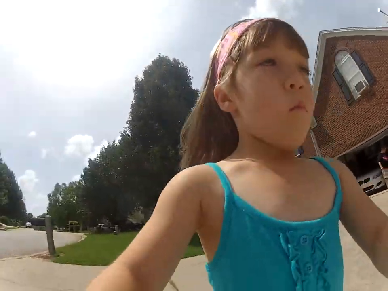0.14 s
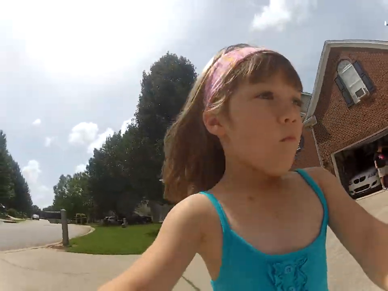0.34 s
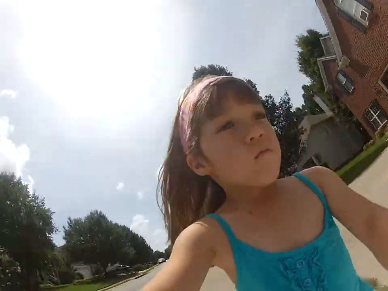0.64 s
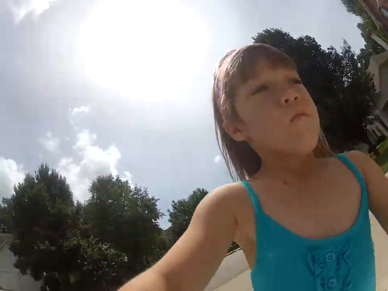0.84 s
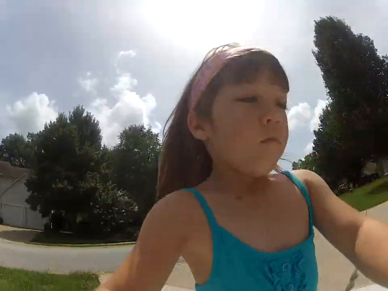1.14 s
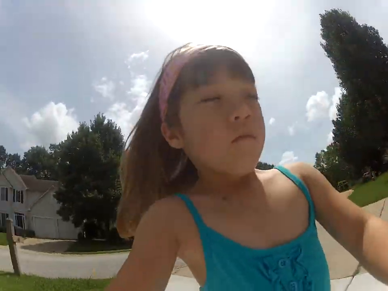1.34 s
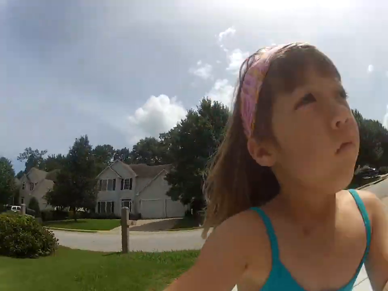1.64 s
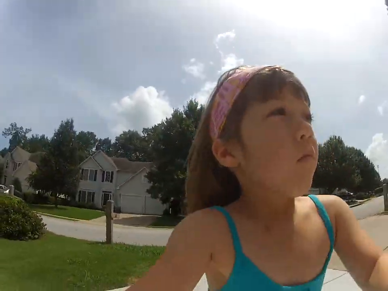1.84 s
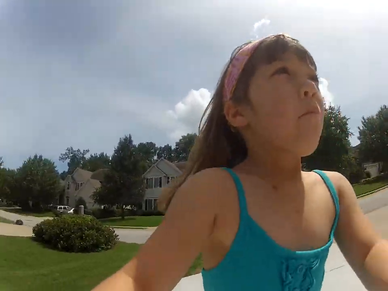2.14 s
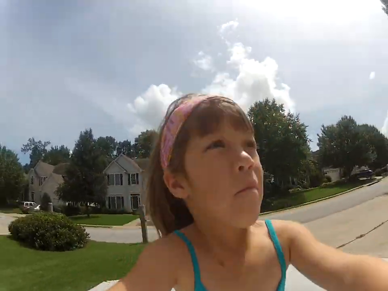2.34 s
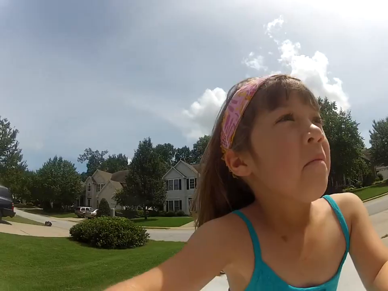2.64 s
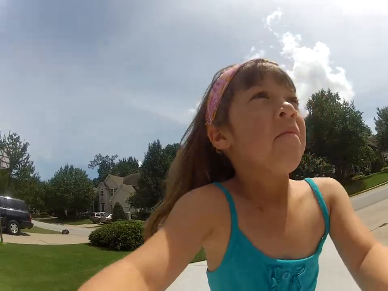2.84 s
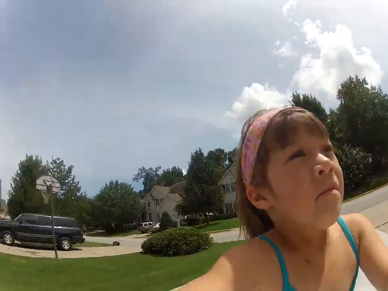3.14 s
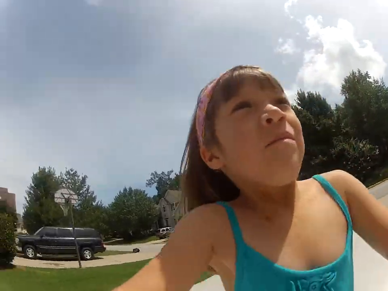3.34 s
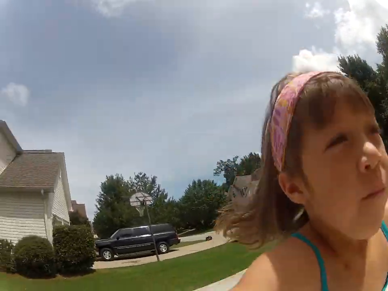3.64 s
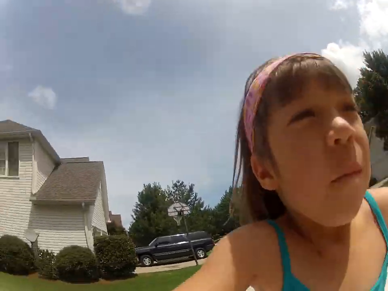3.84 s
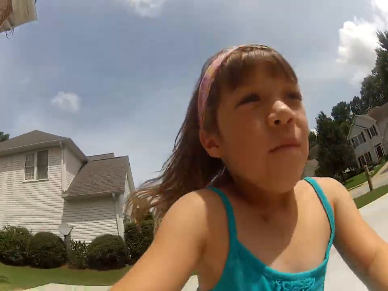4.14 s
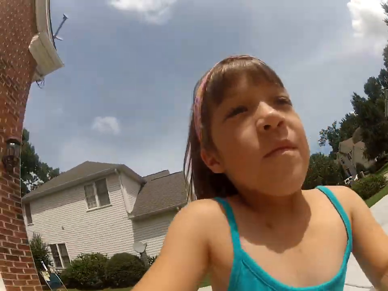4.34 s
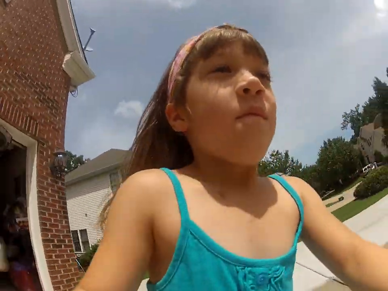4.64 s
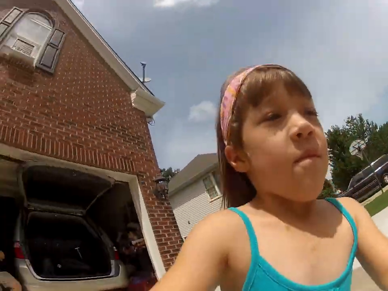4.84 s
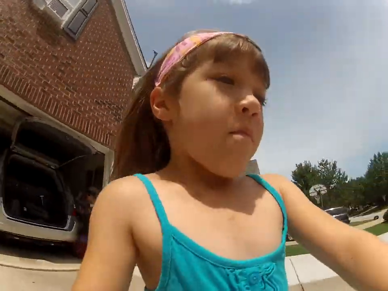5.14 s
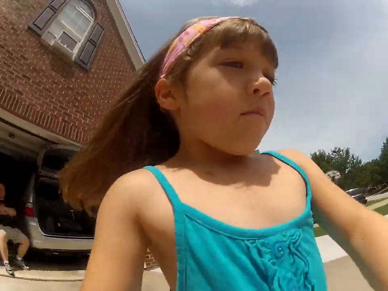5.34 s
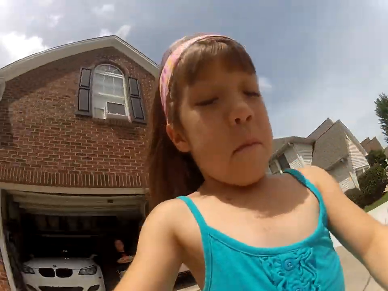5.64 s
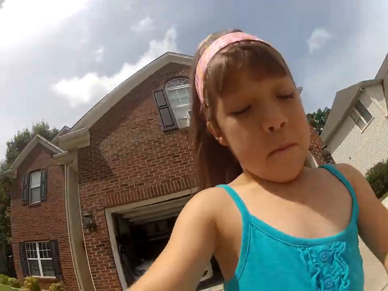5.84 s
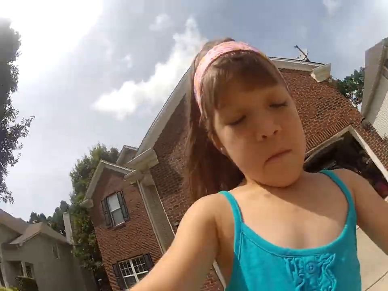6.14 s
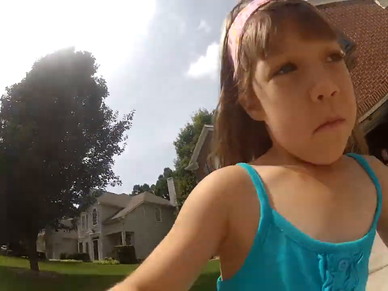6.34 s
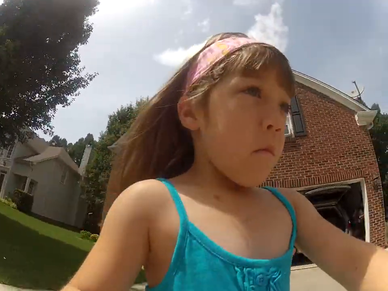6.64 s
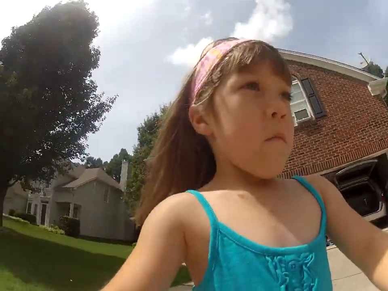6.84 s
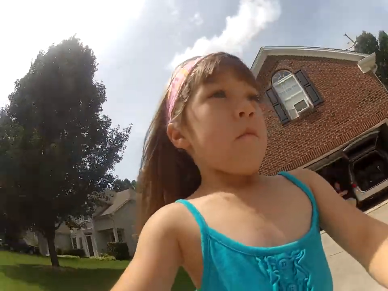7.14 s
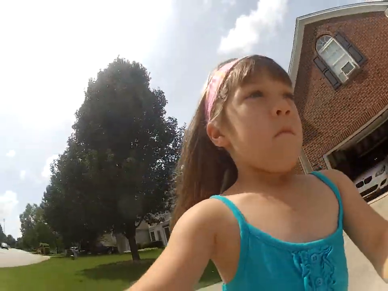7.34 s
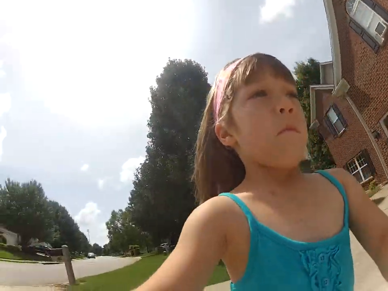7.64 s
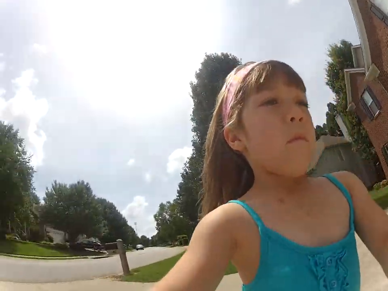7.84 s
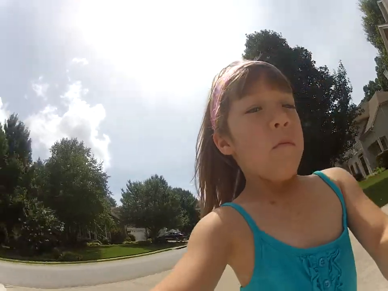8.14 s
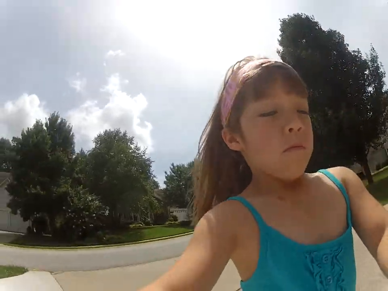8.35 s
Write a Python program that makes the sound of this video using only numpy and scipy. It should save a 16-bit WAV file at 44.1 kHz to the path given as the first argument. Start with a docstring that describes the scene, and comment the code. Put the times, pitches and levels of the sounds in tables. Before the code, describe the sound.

Continuous rolling of small hard wheels on rough concrete: deep, shuddering rumble, mid-pitched drone and dry gritty rattle. Irregular knocks punctuate it, the strongest around four seconds, and the wheels briefly run light after hard blows. Fine bearing whirs, mudguard scuffs and metallic lever clinks come and go, with more clinks near the end. The microphone is fixed to the handlebar, without echo; the right side is nearly silent hiss.

```python
"""First heard is a rough rumble with a droning note: a kick scooter circling on a concrete driveway.
Random bumps excite resonances of frame and hard wheels; joints and stones add damped thuds and clacks.
Loose fittings chatter, most at strong swings of the frame; sand, brake lever, mudguard and bearing add
fine noises. The microphone is fixed to the handlebar; nearly all of the sound is in the left channel."""
import sys
import numpy as np
from scipy import signal
from scipy.fft import rfft, irfft
from scipy.io import wavfile
from scipy.ndimage import uniform_filter1d

SR = 44100
rng = np.random.default_rng(int(sys.argv[2]) if len(sys.argv) > 2 else 0)


def master(y):
    """Save y as 16-bit WAV."""
    cut = np.clip(np.atleast_2d(y).T, -1, 1)
    pcm = np.round(cut * 32767)  # scale
    wavfile.write(sys.argv[1], SR, pcm.astype(np.int16))


N = 375291
TIME = np.arange(N) / SR

# Levels are nominal, ahead of the trims of each source and the input gain. Spectra are relative, per Hz.
# microphone inputs: spectrum of the hiss [f/Hz, level/dB]
HISS = [(20, 0), (200, 3), (1000, -4), (4000, -8), (15000, -9)]
EDGE_HZ = 15500  # upper band limit

# spells in which a wheel bearing whirs [start t/s, end t/s, f/Hz, level/dB, wander as a share of f]
WHIRS = [(1.45, 1.8, 2090, -71, 0.016), (1.872, 2.357, 2120, -55.5, .012), (2.54, 3.2, 2110, -55, 0.02),
         (3.25, 3.4, 2150, -67, .02), (4.9, 5.3, 3100, -67, .06), (6.7, 7.15, 3380, -58.5, .05),
         (7.753, 7.97, 2870, -58.5, .012)]
WHIR_FADE_DB_PER_S = 91

# the loudest clinks of the brake lever against its stop [t/s, level/dB]
CLINKS = [(0.153, -62), (1.241, -59), (4.545, -61), (4.725, -62), (6.131, -57.5), (6.925, -58),
          (6.981, -57), (7.353, -50.5), (7.408, -55), (7.45, -60), (7.878, -52.5), (7.953, -52),
          (8.083, -53), (8.146, -54.5)]
# modes of the brake lever [f/Hz, level/dB, t60/s]
LEVER = [(1354, 4, 0.059), (2850, 1.5, 0.046), (4280, -3, 0.044), (4900, -0.5, 0.029), (6900, -1, 0.058),
         (7700, -11, 0.05), (8108, -12, 0.05), (9300, -14, .04), (10950, -18, .05), (14240, -17, 0.07)]
# fainter clinks come at random, their level relative to that of the chatter
CLINKS_PER_S, CLINK_OVER_DB, CLINK_SPREAD_DB = 2.4, -12, 0.5

# scuffs of the rear mudguard on its wheel [t/s, level/dB, t60/s, ringing f/Hz, share of ring 0-1]
SCUFFS = [(4.477, -46.5, 0.36, 3300, 0.1), (4.703, -38.5, 0.23, 3900, 0.1), (6.471, -43, 0.19, 3640, 0.2),
          (6.489, -39.5, 0.067, 3780, 0.7), (7.35, -40, 0.066, 4360, 0.15),
          (7.933, -32.5, 0.073, 2900, 0.23), (7.943, -38, 0.14, 8160, 0.4)]

# the loudest grains of sand snapping under a wheel [t/s, peak level/dB, t60 of the crumbs/s]
GRIT = [(0.215, -43, 0.024), (0.257, -44, .022), (1.462, -46, .02), (1.936, -41.5, 0.022),
        (2.1395, -39, .004), (2.164, -37, 0.0056), (2.285, -39.5, 0.014), (2.416, -39, .02),
        (2.514, -40, .012), (2.856, -37, .004), (3.008, -46, .02), (3.035, -46, .03), (3.452, -46, .01),
        (3.867, -46, .012), (4.48, -39, 0.02), (4.506, -38, .02), (4.541, -39, .022), (4.591, -43, .015),
        (6.066, -43, .015), (6.115, -41, 0.0088), (6.283, -40, .022), (6.68, -37, .004), (6.831, -42, .008),
        (6.878, -40, 0.025), (6.909, -36.5, .018), (7.125, -39, 0.041), (7.324, -39, 0.024),
        (7.758, -36.5, 0.033), (7.859, -39, .022), (7.977, -35, 0.026), (8.127, -38.5, 0.024)]
# fainter grains come at random, their level relative to that of the chatter
GRIT_PER_S, GRIT_OVER_DB, GRIT_SPREAD_DB = 3, 9.5, 2

# scatter of the resonances of each contact, and of its brightness
TINT_DB, TINT_DB_PER_OCTAVE = 4, 1.5
# taps between fittings: typical length, its scatter either way, range of strengths, rate
TAP_S, TAP_OCTAVES, TAP_RANGE_DB, TAPS_PER_S = .0017, 1.9, 20.5, 80
# loose clamps and bolts, each rattling at its own pitch [f/Hz, width/Hz, level/dB]
BOLTS = [(2860, 260, -8.5), (3760, 800, -7), (5020, 1700, -5), (6840, 89, -7.5), (8080, 110, -12.5),
         (9500, 1000, -10), (10900, 1000, -11), (14200, 200, -6)]
# spectrum of the chatter [f/Hz, level/dB]
CHATTER = [(600, 7.5), (1600, -4), (2300, -2), (3000, -0.5), (3900, -3), (5000, 0.1), (6200, -7),
           (8300, -8.5), (11000, -13), (14000, -20.5), (15500, -47.5)]
# spectrum of the rasp of sand under the wheels [f/Hz, level/dB]
SAND = [(600, -28), (1500, 1.5), (2100, 1), (3000, 1.5), (3900, 0), (5100, -1), (6000, -6.5), (8000, -16.5),
        (13000, -46.5), (15500, -41)]
# share of bright rattling in the chatter, the rest being dull rasp [t/s, share 0-1]
LOOSE = [(0, 0.75), (2.8, 0.3), (4.6, 0.79), (6.3, 0.67), (7.0, 0.88), (8.5, 0.53)]
RASP_DB = -1.5  # rasp against the chatter
SCRAPE_DB = -77  # faint scrape that stays when the wheels run light

# dips in the concrete that flex the deck [t/s, peak level/dB, f/Hz]
BOOMS = [(0.149, -18, 295), (0.592, -23.5, 295), (0.948, -18, 316), (1.602, -15, 285), (2.415, -15.5, 259),
         (2.427, -14.5, 289), (2.488, -19.5, 270), (3.047, -16, 335), (3.075, -21, 348),
         (3.509, -16.5, 320), (3.719, -21, 306), (4.325, -19, 306), (4.895, -24, 320), (5.417, -20, 316),
         (6.343, -16.5, 257), (6.523, -15, 323)]
BOOM_RISE_S, BOOM_FALL_S = 0.0051, 0.0059

# pits and pebbles that make a wheel ring without jolting the frame [t/s, level/dB, f/Hz]
CLACKS = [(0.189, -25.5, 746), (0.257, -28, 720), (0.381, -19, 608), (0.838, -27.5, 594),
          (0.87, -25.5, 780), (0.933, -21, 710), (1.582, -27.5, 780), (1.625, -25, 647), (1.644, -30, 690),
          (1.673, -25.5, 720), (1.775, -27, 734), (2.366, -28, 715), (2.411, -24.5, 580), (2.445, -25, 690),
          (2.464, -23, 730), (2.472, -27, 696), (2.48, -19.5, 664), (2.989, -29, 736), (3.015, -25.5, 720),
          (3.084, -29, 855), (3.546, -29.5, 724), (3.677, -37, 754), (4.279, -27.5, 776), (4.297, -24, 710),
          (4.305, -19, 697), (4.319, -20, 798), (4.912, -26.5, 520), (4.924, -24, 684), (5.416, -23, 697),
          (5.676, -28.5, 660), (5.932, -26.5, 764), (6.206, -26.5, 860), (6.374, -23, 666),
          (6.382, -27, 560), (7.985, -28.5, 780), (8.126, -27, 650)]
# modes of a wheel [multiple of its pitch, level/dB, t60/s]
HUB = [(1, 0, 0.034), (1.22, -9, 0.029), (1.85, -18, 0.031), (2.7, -28, 0.018)]

# joints and stones under the wheels [t/s, thud level/dB, clack level/dB, clack f/Hz,
# rim crack level/dB, rattle level/dB, depth of the lull that follows/dB (none if negative)]
KNOCKS = [(0.158, -9, -31.5, 800, -38, -46, 2.5), (0.303, -10, -28.5, 710, -45, -43.5, 3),
          (0.39, -10, -26.5, 640, -39, -40.5, 9), (0.589, -7, -21, 500, -23, -32.5, 11),
          (0.832, -8, -25, 620, -38, -39.5, 1), (0.948, -10.5, -23, 854, -38, -49, 0.5),
          (1.065, -12, -26.5, 554, -32, -39.5, -4), (1.088, -19, -25, 654, -35, -46.5, 6),
          (1.321, -9.5, -23.5, 756, -27.5, -34.5, 16.5), (1.491, -8.5, -28.5, 686, -45, -42.5, 5.5),
          (1.599, -12.5, -22.5, 510, -30.5, -39, 2), (1.621, -20, -30, 780, -32, -44, 0.5),
          (1.663, -12, -29, 710, -45, -47, 6.5), (2.169, -9.5, -30, 825, -40, -40, 2.5),
          (2.257, -11.5, -29, 720, -43, -51, 5.5), (2.416, -13, -18.5, 710, -38, -43, 0.5),
          (2.423, -11, -11.5, 680, -25, -41, 0), (2.492, -9.5, -25.5, 764, -35, -41.5, 5),
          (2.635, -9.5, -37, 720, -43, -50, 4.5), (2.855, -9.5, -40, 850, -43, -42, 7),
          (3.044, -13, -33, 720, -48, -47, 4), (3.13, -12, -23.5, 760, -36, -41, 3.5),
          (3.179, -9, -27.5, 734, -38, -42.5, 8), (3.25, -12.5, -25, 523, -36, -39, 4),
          (3.275, -24, -30, 880, -38, -45, 15), (3.512, -9, -16.5, 737, -23.5, -36.5, 1),
          (3.517, -8, -24.5, 690, -32, -32, -1.5), (3.524, -11.5, -23, 537, -33, -38, 17.5),
          (3.708, -18, -33, 800, -41, -57, 3.5), (3.719, -9.5, -24.5, 540, -28, -40, 10),
          (3.904, -11.5, -24.5, 517, -31, -41.5, 12.5), (4.128, -5.5, -10.5, 716, -22, -28.5, 12),
          (4.414, -11.5, -34.5, 720, -46, -40.5, 4), (4.608, -8, -25, 720, -38, -42, 5),
          (4.777, -10, -27, 700, -43, -40.5, 4), (4.807, -9, -29, 714, -40, -43, 2.5),
          (5.11, -11, -31.5, 710, -44, -48.5, 3.5), (5.243, -12, -40, 720, -50, -43, 3),
          (5.349, -11.5, -32.5, 720, -41, -47, 3.5), (5.407, -7, -21.5, 766, -37, -35.5, -4),
          (5.426, -9, -23.5, 726, -32, -37.5, -2), (5.453, -8.5, -22.5, 650, -33, -41, 9),
          (5.667, -6.5, -22, 560, -25.5, -28.5, 14.5), (5.98, -8.5, -36, 720, -41, -44, 8),
          (6.088, -10, -29, 720, -40, -39, 2.5), (6.324, -17, -24, 665, -33.5, -52, 3),
          (6.342, -9, -25, 890, -36, -44, 1), (6.361, -9.5, -18, 625, -31, -39.5, 9),
          (6.521, -17, -28.5, 726, -48, -57, 5.5), (6.682, -14.5, -39.5, 724, -38, -48, 5.5),
          (7.059, -12, -36, 720, -45, -39, 3), (7.162, -10.5, -32.5, 720, -41, -40.5, 7.5),
          (7.476, -15, -30, 730, -37, -53, 5.5), (7.665, -10, -34.5, 720, -44, -49, 3.5),
          (7.936, -10.5, -26.5, 670, -47, -30.5, -1.5), (8.238, -6.5, -19, 684, -26.5, -40, -2.5),
          (8.256, -8, -22.5, 590, -28.5, -40, 8.5), (8.494, -8, -28, 520, -39, -49, 16)]
# modes of a wheel's rim [f/Hz, level/dB]
RIM = [(980, -0.5), (1370, -3.5), (1900, -11.5)]
# the axle rings between fork and wheel: pitch, and level against the clack
AXLE_HZ, AXLE_DB = 513, -8.5
# small stones met at random between the large ones
STONES_PER_S, STONE_SPREAD_DB, STONE_HZ = 3, 1.4, 730
STONE_THUD_DB, STONE_CLACK_DB, STONE_CRACK_DB, STONE_RATTLE_DB = -17.5, -34, -41.5, -49.5

# a blow takes the weight off the wheels; it comes back later after a deeper lull
LULL_ONSET_S, LULL_S, LULL_S_PER_DB, LULL_EDGE = 0.027, 0.026, 0.0125, 2.9
# dB of drone and of chatter lost for each dB of rumble lost in a lull
DRONE_FOLLOWS, CHATTER_FOLLOWS = 0.93, 1.17
# short swells and dips of the rolling sound
# [middle t/s, half length/s, rise of rumble level/dB, of drone level/dB, of chatter level/dB]
SWELLS = [(0.272, 0.031, 4.5, 0.5, 2.5), (0.374, 0.022, 7, 6.5, 5), (0.455, .025, -1, 1.5, -2),
          (0.66, 0.027, -2.5, 1.5, 2), (1.188, .03, -0.5, -1, -6), (1.384, 0.033, -2.5, 0, -4),
          (0.525, 0.051, 3.5, 1.5, 3), (0.712, 0.025, 1, 5.5, 2.5), (0.852, 0.022, 0.5, 3, -1),
          (0.943, 0.0092, 2, 5.5, 6.5), (1.249, 0.014, 3, 4, 6), (1.467, 0.031, 10, 7, 8),
          (1.614, 0.03, 0.5, 6.5, 3.5), (2.457, .04, -1, 1, 7), (2.925, .035, 0.5, 3, -1),
          (3.03, 0.045, 2.5, 1.5, 3), (3.504, .03, -5, -0.5, -2), (3.323, 0.038, -2.5, -1, 6),
          (3.606, 0.019, -1.5, -7, -2), (3.8, .05, -2, -0.5, -4.5), (4.02, 0.031, -6, -0.5, -7),
          (4.22, .03, -1, -1, 0), (4.306, 0.027, 0.5, 9.5, 0.5), (4.38, 0.07, 0.5, -1, -2),
          (4.55, 0.058, 2, 1.5, 2.5), (4.9, 0.05, -1, 2.5, 0.5), (5.427, .035, 1, 5.5, 1),
          (5.535, 0.028, 2, 2.5, 3), (5.778, 0.021, -3.5, 2.5, 2), (5.903, 0.043, -0.5, 0.5, 0),
          (6.302, 0.031, -0.5, 3.5, 4), (6.384, .018, -1.5, 9.5, 4), (6.554, 0.029, 1, 1, -6),
          (6.742, 0.028, -0.5, 3.5, 3), (7.005, 0.027, -0.5, -1, 5.5), (7.08, 0.02, -5, -7, -5),
          (7.23, 0.033, -3, 0.5, -4), (7.54, .025, 1, 0.5, -4), (7.813, 0.025, -2, -1, -8),
          (8.038, 0.019, -2, -3, -6), (8.39, 0.035, -3, -4, -6.5)]
# the grain of the concrete changes along the way, and the fittings answer it most (rms)
UNEVEN_DB, CHATTER_UNEVEN_DB = 1.03, 1.74

# the ride with both wheels firmly down
# [t/s, frame rumble level/dB, wheel drone level/dB, chatter level/dB]
RIDE = [(0.0, -30, -49, -66.5), (0.24, -26, -40, -53), (0.41, -25.5, -44.5, -58), (0.85, -23.5, -36.5, -56),
        (1.21, -27.0, -43.5, -58), (1.47, -18, -36, -45), (1.79, -25.5, -40.5, -62),
        (1.96, -21, -38.5, -53.5), (2.39, -24.0, -38.0, -59.5), (2.97, -22, -35.0, -56.5),
        (3.51, -15.5, -33, -47.5), (4.71, -23.5, -39.5, -54), (4.94, -21, -37.5, -56),
        (5.45, -25.5, -41.5, -53.5), (6.09, -20.0, -37.0, -53.5), (6.86, -23.0, -40.5, -54),
        (7.34, -20, -37.5, -51.5), (8.5, -23.5, -39, -52)]
# resonances of deck and steering column [f/Hz, level/dB]
FRAME = [(15, -40), (28, -24.5), (50, -4.5), (86, 2), (105, -2.5), (140, 1.5), (165, 3.5), (215, -1),
         (255, -15), (335, -9), (380, -19.5), (520, -29.5), (900, -68.5)]
# resonances of the wheels [f/Hz, level/dB]
WHEEL = [(250, -22.5), (450, -17), (590, -10.5), (665, 5.5), (800, 1), (850, -3), (905, -0.5), (975, -15.5),
         (1100, -8.5), (1260, -14.5), (1360, -14), (1490, -22), (1600, -32), (2200, -30), (4000, -70.5)]
# the rider's shifting weight retunes the scooter [t/s, steering column f/Hz, wheel f/Hz]
TUNING = [(0.0, 180, 680), (0.07, 164.6, 773), (0.23, 181, 697), (0.75, 161, 737), (0.85, 185, 712),
          (1.37, 157.5, 737), (1.47, 186.5, 719), (1.77, 164.8, 733), (2.51, 172.1, 721),
          (3.41, 161.8, 769), (3.62, 176, 726), (3.72, 184, 795), (3.79, 164.4, 766), (4.14, 167, 707),
          (4.21, 154, 774), (4.52, 171.5, 737), (8.17, 170.5, 732), (8.5, 165, 688)]
# second bend of the column against its first [t/s, level/dB]
BENDS = [(0, 4), (0.6, 5), (1.2, 4), (1.9, -1), (2.3, -3), (3.2, -2), (3.8, 1.5), (4.4, 0.5), (5.2, 1.5),
         (5.9, -3), (6.45, 4), (7.1, 2.5), (7.6, -2.5), (8.1, -4), (8.5, 1)]
# pitch ratio of the second bend to the column's, and rms sway of the balance of the bends
SECOND_BEND, BEND_SWAY_DB = 1.22, 3
# boom of the deck and grating of the rims against the drone [t/s, deck level/dB, rim level/dB]
BODY = [(0, 6, -15), (0.35, 4.5, -18), (0.5, -2, -17), (0.9, 4, -21.5), (1.7, 4.5, -18), (2.1, 1.5, -20.5),
        (2.95, -1, -20), (3.1, 7.5, -22), (4.2, 3.5, -16), (4.5, 6, -21), (5.3, 8, -19), (5.5, 3, -15),
        (5.9, 5.5, -20), (6.7, 6, -18.5), (7.0, 0, -16), (7.4, 3.5, -15.5), (8.05, 1, -15), (8.35, 5, -15)]
# the harder the wheels are driven, the more deck and rims answer: extra dB per dB of drone
DECK_GROWTH, RIM_GROWTH = 0.18, .45


def gain_of(db):
    """Level law: decibels to an amplitude ratio."""
    return 10 ** (np.asarray(db) / 20)


def evened(x):
    """Normalization to rms 1."""
    return x / np.sqrt(np.mean(x ** 2) + 1e-20)


def steadied(x, size):
    """Normalization of the running power: about rms 1 within every stretch of about size samples."""
    power = abs(uniform_filter1d(uniform_filter1d(x ** 2, size), size))
    return x / np.sqrt(power + 1e-12)


def curves(rows):
    """Linear interpolation of each table column to every sample."""
    t, *columns = np.transpose(rows)
    return [np.interp(TIME, t, column) for column in columns]


def add(mix, s, sound):
    """Superposition: a sound is added to the mix from time s."""
    part = mix[max(round(s * SR), 0):][:len(sound)]
    part += sound[:len(part)]


def drift(size):
    """Low-passed noise: a slow fluctuation of rms 1 over about size samples."""
    noise = rng.standard_normal(N)
    return evened(uniform_filter1d(uniform_filter1d(noise, size), size))


def bumps(per_s, spread_db):
    """Impulsive excitation: random small impacts, a few much larger than the rest."""
    chance, size, side = rng.random((3, N))
    hit = chance < per_s / SR
    out = np.zeros(N)
    height = np.minimum(-np.log(1 - size[hit]), 4)
    out[hit] = gain_of(spread_db * height) * np.sign(side[hit] - .5)
    return evened(out)


def at_random(per_s, spread_db, level_db):
    """Poisson process: rows (s, dB) of chance events, scattered around a level curve."""
    gap, luck = rng.random((200, 2)).T
    s = np.cumsum(-np.log(1 - gap)) / per_s
    db = np.interp(s, TIME, level_db) + spread_db * np.log(luck / (1 - luck)) / 2
    return np.transpose([s, db])[s < TIME[-1]]


def ring(x, spectrum, size=8192):
    """Minimum-phase response: a causal body with this spectrum; white noise keeps its power."""
    hz = np.fft.rfftfreq(size, 1 / SR)
    f, db = np.transpose(spectrum)
    db = np.interp(np.log(hz + 1), np.log(f), db)
    log_gain = np.log(gain_of(np.r_[db, db[-2:0:-1]]))
    # the phase of a causal body is the Hilbert transform of its log gain
    response = np.fft.ifft(np.exp(np.conj(signal.hilbert(log_gain)))).real[:size // 2]
    return signal.oaconvolve(x, response / np.linalg.norm(response))[:N]


def resonate(x, hz, width_hz):
    """Resonance: a two-fold pole with steep sides that can follow a pitch curve; rms 1."""
    turn = np.exp(2j * np.pi * np.cumsum(hz * np.ones(len(x))) / SR)
    r = np.exp(-np.pi * width_hz / SR)
    # filter around zero frequency, then turn back up to the pitch
    envelope = signal.lfilter([1], [1, -2 * r, r * r], x / turn)
    return evened((turn * envelope).real)


def swing(t, hz, rise_s, fall_s):
    """Heavily damped oscillation whose largest swing is at t = 0."""
    envelope = np.exp(np.where(t < 0, -(t / rise_s) ** 2, -t / fall_s))
    return -np.cos(2 * np.pi * hz * t) * envelope


def spurt(t, fall_s):
    """Exponential decay after a quick rise to the top at t = 0."""
    return np.exp(-abs(t) / np.where(t < 0, .0015, fall_s))


def tinted(size):
    """Random modal response: noise with a few chance resonances and a brightness of its own."""
    hz = np.geomspace(1200, 16000, 26)
    octaves = np.log2(hz / 4500)
    resonances_db = TINT_DB * rng.standard_normal(len(hz))
    db = resonances_db + TINT_DB_PER_OCTAVE * rng.standard_normal() * octaves
    colour = np.interp(np.fft.rfftfreq(size, 1 / SR), hz, evened(gain_of(db)))
    return irfft(rfft(rng.standard_normal(size)) * colour, size)


def bearing(drone_db):
    """Forced resonance: balls tick a dry bearing into a fuzzy whir and hiss, stronger with the drone."""
    balls, waver, out = bumps(per_s=700, spread_db=2.0), drift(size=400), np.zeros(N)
    for start, end, hz, db, wander in WHIRS:
        whir = resonate(balls, hz * (1 + wander * waver), width_hz=170)
        hiss = resonate(balls, hz * 1.155, width_hz=670)
        outside_s = abs(TIME - np.clip(TIME, start, end))
        out += gain_of(db - 6.0 - WHIR_FADE_DB_PER_S * outside_s) * (0.9 * whir + hiss)
    return out * steadied(gain_of(drone_db + .6 * drift(size=1500)), size=22000)


def clinks(chatter_db):
    """Modal synthesis: every touch ticks and rings the modes of the lever in another balance."""
    out, t = np.zeros(N), np.arange(SR // 8) / SR
    hz, mode_db, t60 = np.transpose(LEVER)[:, :, None]
    faint = at_random(CLINKS_PER_S, CLINK_SPREAD_DB, chatter_db + CLINK_OVER_DB)
    for s, db in [*CLINKS, *faint]:
        luck, phase = rng.standard_normal((2, len(LEVER), 1))
        decay = gain_of(mode_db + 2.6 * luck - 60 * t / t60)
        modes = decay * np.sin(2 * np.pi * (hz * t + phase))
        tick = 0.77 * np.exp(-t / 0.0025) * rng.standard_normal(len(t))
        add(out, s, gain_of(db + 7) * (1 - np.exp(-t / 0.0011)) * (modes.sum(0) + tick))
    return out


def scuffs():
    """Friction excitation: the mudguard rubs with a flutter, rings and lets go."""
    out, t = np.zeros(N), np.arange(SR // 4) / SR
    flutter = 1 + 0.14 * np.cos(2 * np.pi * 150 * t)
    for s, db, t60, hz, share in SCUFFS:
        rub, drive = rng.standard_normal((2, len(t)))
        share = np.clip(share, 0, 1)
        ringing = resonate(drive, hz, width_hz=470)
        sound = np.sqrt(1 - share) * rub + 1.03 * np.sqrt(share) * ringing
        add(out, s, gain_of(db - 60 * t / t60) * flutter * sound)
    return out


def grit(chatter_db):
    """Brittle fracture: grains of sand crack under a wheel in a bright snap, then crumbs."""
    out, t = np.zeros(N), np.arange(1000) / SR
    chance = at_random(GRIT_PER_S, GRIT_SPREAD_DB, chatter_db + GRIT_OVER_DB)
    faint = [(s, db, .01) for s, db in chance]
    for s, db, t60 in GRIT + faint:
        crumbs = (1 - np.exp(-t / 0.00046)) * tinted(size=len(t))
        snap = np.diff(rng.standard_normal(len(t)), prepend=0)  # differencing brightens the noise
        add(out, s, gain_of(db + 2.0 - 60 * t / t60) * crumbs + gain_of(db + 6 - 60 * t / .002) * snap)
    return out


def bursts(per_s, length_s):
    """Amplitude modulation: short random spurts of noise."""
    jolts = abs(bumps(per_s, spread_db=1.6))
    for smear_s in (length_s, .0008):
        jolts = signal.lfilter([1], [1, -np.exp(-1 / (smear_s * SR))], jolts)
    return evened(jolts * rng.standard_normal(N))


def taps():
    """Repeated impact: separate gritty taps, each in its own colour; the shortest are the sharpest."""
    out, t = np.zeros(N), np.arange(1024) / SR
    for when, strength, length in rng.random((int(TAPS_PER_S * TIME[-1]), 3)):
        length_s = TAP_S * 2 ** (TAP_OCTAVES * (2 * length - 1))
        u = t / length_s
        peak = gain_of(TAP_RANGE_DB * strength) / length_s ** .3
        add(out, when * TIME[-1], peak * u * np.exp(-u ** 1.3) * tinted(size=len(t)))
    return evened(out)


def chatter(shake, chatter_db):
    """Load-dependent contact noise: sand rasps under each swing; fittings rattle in short taps."""
    loose = np.clip(curves(LOOSE)[0], 0, 1)
    pressure = 1.04 + abs(steadied(shake, size=3000)) ** 1.3
    rasp = ring(steadied(pressure * bumps(per_s=3500, spread_db=2.5), size=1800), SAND)
    bolts = sum(gain_of(db) * resonate(bursts(per_s=25, length_s=0.0045), hz, width)
                for hz, width, db in BOLTS)
    rattle = steadied(pressure * ring(taps() + 0.31 * bolts, CHATTER), size=3000)
    blend = gain_of(RASP_DB) * np.sqrt(1 - loose) * rasp + np.sqrt(loose) * rattle
    return gain_of(chatter_db - 0.9) * blend + gain_of(SCRAPE_DB) * rasp


def booms():
    """Damped flexure: the deck bends and swings for a few cycles."""
    out, lead = np.zeros(N), .015
    t = np.arange(SR // 15) / SR - lead
    for s, db, hz in BOOMS:
        add(out, s - lead, gain_of(db) * swing(t, hz, BOOM_RISE_S, BOOM_FALL_S))
    return out


def clacks():
    """Free modal vibration: a wheel drops into a pit and rings for a few hollow cycles."""
    out, t = np.zeros(N), np.arange(SR // 12) / SR
    multiple, mode_db, t60 = np.transpose(HUB)[:, :, None]
    for s, db, hz in CLACKS:
        luck, phase = rng.standard_normal((2, len(HUB), 1))
        decay = gain_of(mode_db + 1.0 * luck - 60 * t / t60)
        modes = decay * np.sin(2 * np.pi * (hz * multiple * t + phase))
        add(out, s - .0015, gain_of(db + 2.5) * (1 - np.exp(-t / .0009)) * modes.sum(0))
    return out


def stones(rumble_db):
    """Chance impacts: small knocks that follow the level of the rolling at that moment."""
    chance = at_random(STONES_PER_S, STONE_SPREAD_DB, rumble_db - np.median(rumble_db))
    return [(s, db + STONE_THUD_DB, db + STONE_CLACK_DB, STONE_HZ,
             db + STONE_CRACK_DB, db + STONE_RATTLE_DB, 0) for s, db in chance]


def knocks(rows):
    """Impact response: a blow thuds in the frame, claps in wheel and rim, and throws the fittings."""
    body, rattle = np.zeros(N), np.zeros(N)
    lead = .01
    t = np.arange(3000) / SR - lead
    early = t + .0009  # the light wheel answers before the heavy frame
    scatter = 2 * rng.random((len(rows), 3)) - 1
    for (s, thud_db, clack_db, hz, crack_db, rattle_db, _), (a, b, c) in zip(rows, scatter):
        # a harder blow is shorter and higher
        hardness = np.clip((clack_db - thud_db + 24.5) / 20, 0, 1)
        thud = swing(t, hz=160 * (1 + 0.08 * a + 0.33 * hardness),
                     rise_s=0.0048 / (1 + 2 * hardness), fall_s=0.0083 / (1 + 3.0 * hardness))
        hub = swing(early, hz=hz * (1 + 0.036 * b), rise_s=0.0016, fall_s=0.0033)
        fork = swing(early, hz=345 * (1 + 0.12 * a), rise_s=0.0028, fall_s=0.0036)
        axle = swing(early, hz=AXLE_HZ * (1 + 0.092 * c), rise_s=0.0017, fall_s=0.0045)
        rim = sum(gain_of(db) * swing(early, f * (1 + 0.088 * c), rise_s=0.00084, fall_s=0.0031)
                  for f, db in RIM)
        clack = hub + gain_of(-2.5) * fork + gain_of(AXLE_DB) * axle
        blow = gain_of(thud_db - 1.5) * thud + gain_of(clack_db - 1.3) * clack
        add(body, s - lead, blow + gain_of(crack_db - 3.5) * rim)
        # the thrown fittings land again
        thrown = spurt(t + 0.0011, fall_s=0.0029)
        landing = 0.19 * spurt(t - .008 - 0.0018 * c, fall_s=0.0021)
        burst = thrown + landing + 0.04 * spurt(t, fall_s=0.016)
        add(rattle, s - lead, gain_of(rattle_db + 1.77) * burst * tinted(size=len(t)))
    return body, rattle


def lulls():
    """Unloading: how far the rolling drops, in dB, while the wheels run light after each blow."""
    drop_db = np.zeros(N)
    t = np.arange(SR // 2) / SR
    lift = 1 - np.exp(-(t / LULL_ONSET_S) ** 2)
    for s, *_, depth_db in KNOCKS:
        depth_db = max(depth_db, 0)
        settle = np.exp(-(t / (LULL_S + LULL_S_PER_DB * depth_db)) ** LULL_EDGE)
        add(drop_db, s, depth_db * lift * settle)
    return drop_db


def swells():
    """Level modulation: short swells and dips, in dB, of rumble, drone and chatter apart."""
    return sum(np.outer(rise_db, np.exp(-((TIME - s) / half_s) ** 4))
               for s, half_s, *rise_db in SWELLS)


def rolling(rumble_db, drone_db):
    """Roughness excitation: the grain of the concrete drives wandering resonances of frame and wheels."""
    road = bumps(per_s=1000, spread_db=4.5)
    pits = bumps(per_s=220, spread_db=4.0)
    column_hz, wheel_hz = curves(TUNING)
    column_hz = column_hz * (1 + .06 * drift(size=3500))

    # the steering column bends in two planes
    first = resonate(road, column_hz * .96, width_hz=24)
    second = resonate(road, column_hz * SECOND_BEND, width_hz=24)
    balance_db = curves(BENDS)[0] + BEND_SWAY_DB * drift(size=5000)
    column = steadied(first + gain_of(balance_db) * second, size=6000)
    frame = steadied(ring(road, FRAME) + 0.79 * column, size=1300)

    hub = resonate(pits, wheel_hz * (1 + .065 * drift(size=2500)), width_hz=60)
    upper_hz = wheel_hz * 1.18 * (1 + .04 * drift(size=2000))
    upper = resonate(bumps(per_s=120, spread_db=4), upper_hz, width_hz=70)
    wheels = steadied(ring(evened(road + pits), WHEEL) + .7 * hub + .35 * upper, size=2400)

    deck_hz = 318 * (1 + .055 * drift(size=2500))
    deck = steadied(resonate(bumps(per_s=400, spread_db=4), deck_hz, width_hz=48), size=2600)
    rim_hz = 1240 * (1 + 0.11 * drift(size=1200))
    rim = steadied(resonate(pits, rim_hz, width_hz=440), size=2200)

    deck_db, rim_db = curves(BODY)
    strain_db = drone_db - np.median(drone_db)
    return (gain_of(rumble_db + 0.22) * frame + gain_of(drone_db - 2.0) * wheels
            + gain_of(drone_db + deck_db + DECK_GROWTH * strain_db) * deck
            + gain_of(drone_db + rim_db + RIM_GROWTH * strain_db) * rim)


def scene():
    """Structure-borne sound: everything reaches the microphone through the handlebar, without echo."""
    rumble_db, drone_db, chatter_db = curves(RIDE) + swells()
    lull_db, grain = lulls(), drift(size=1500)
    rumble_db = rumble_db - lull_db + UNEVEN_DB * grain
    drone_db = drone_db - DRONE_FOLLOWS * lull_db + UNEVEN_DB * grain
    chatter_db = chatter_db - CHATTER_FOLLOWS * lull_db + CHATTER_UNEVEN_DB * grain
    roll = rolling(rumble_db, drone_db)
    blows, blow_rattle = knocks(KNOCKS + stones(rumble_db))
    # the rolling is ducked around each blow, so that the knock stands out
    duck = 1 / (1 + 110 * abs(uniform_filter1d(blows ** 2, size=350)))
    shake = duck * roll + blows + booms() + clacks()
    crackle = ring(blow_rattle + grit(chatter_db) + scuffs(), CHATTER)
    fittings = chatter(shake, chatter_db)
    left = shake + fittings + crackle + clinks(chatter_db) + bearing(drone_db)
    # of the scooter, only the knocks get through, faintly, on the right
    right = gain_of(-59.0) * blows + gain_of(-23.5) * blow_rattle
    return np.array([left, right])


def record(dry):
    """Transduction: input gain, a faint hiss in both channels, overload and the band limit."""
    hiss = np.array([ring(rng.standard_normal(N), HISS) for _ in dry])
    loud = np.clip(gain_of(6) * dry + gain_of([[-73], [-68.5]]) * hiss, -1, 1)
    low_pass = signal.firwin(151, EDGE_HZ, window=("kaiser", 9), fs=SR)
    return signal.oaconvolve(loud, low_pass[None], "same")


dry = scene()
out = record(dry)
master(out)
```